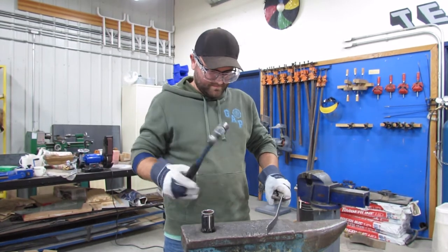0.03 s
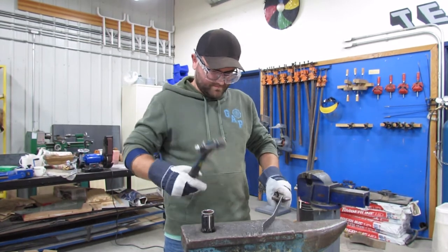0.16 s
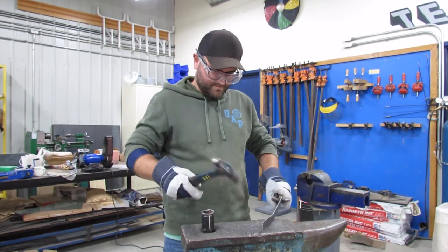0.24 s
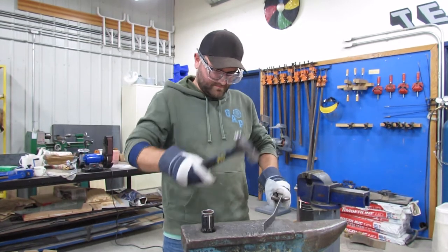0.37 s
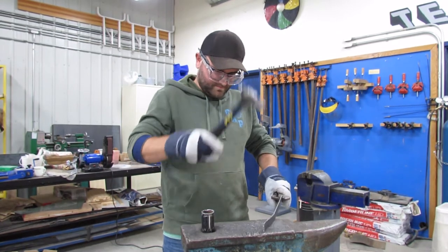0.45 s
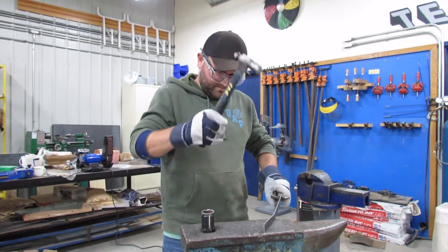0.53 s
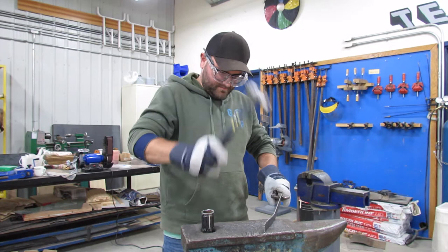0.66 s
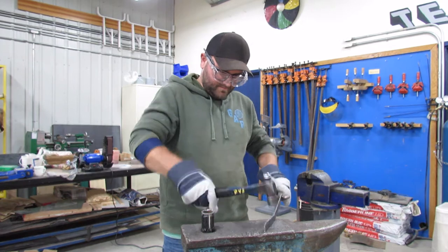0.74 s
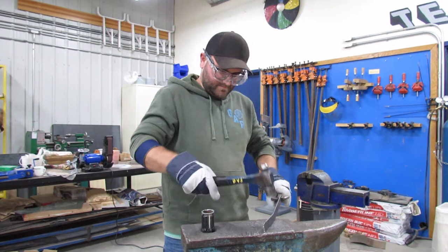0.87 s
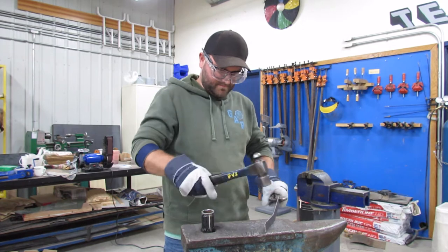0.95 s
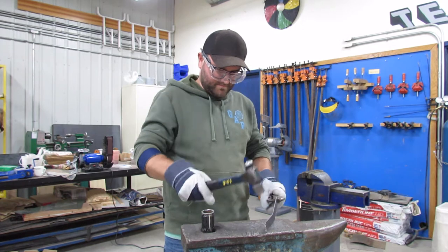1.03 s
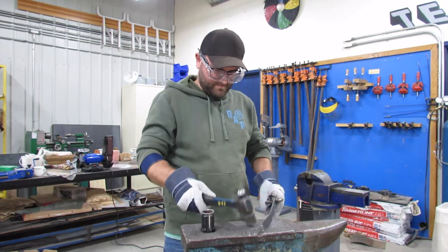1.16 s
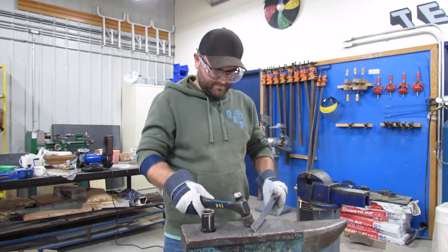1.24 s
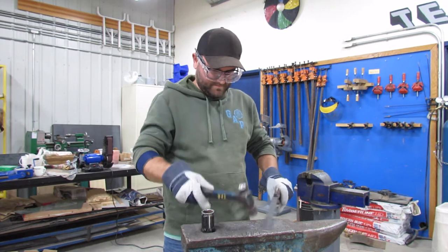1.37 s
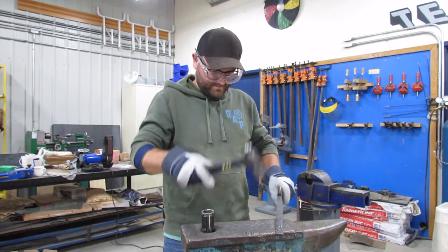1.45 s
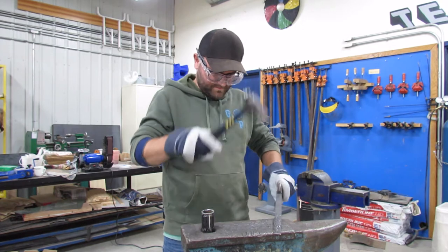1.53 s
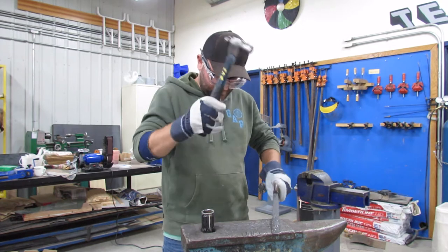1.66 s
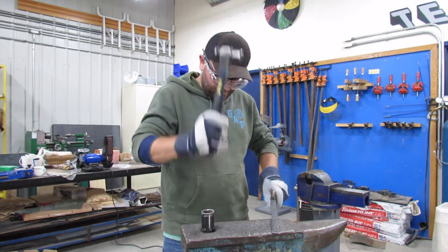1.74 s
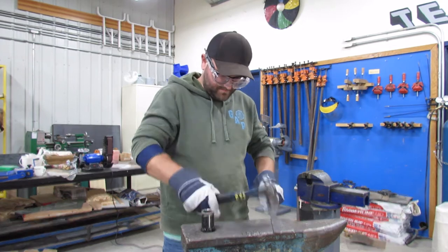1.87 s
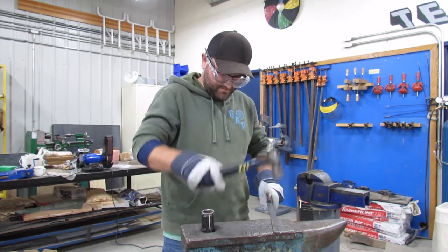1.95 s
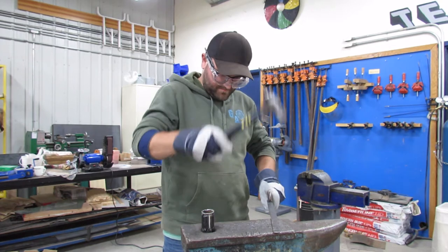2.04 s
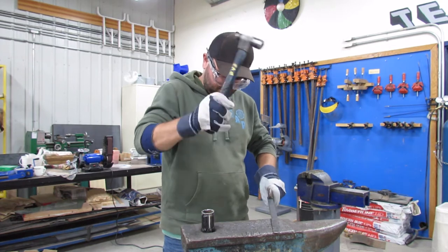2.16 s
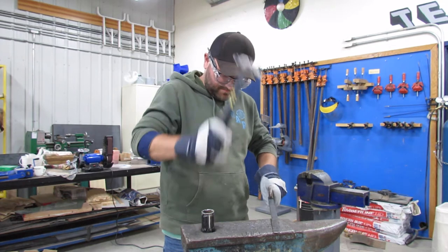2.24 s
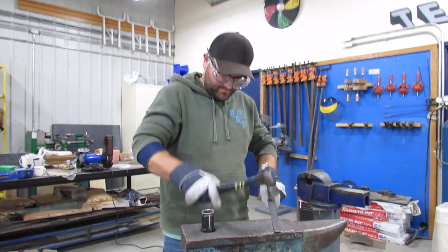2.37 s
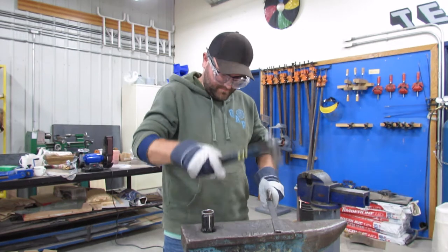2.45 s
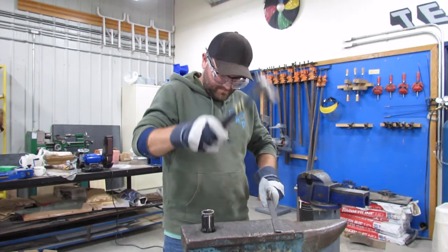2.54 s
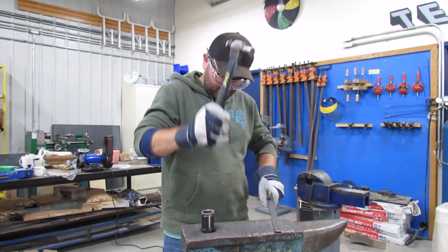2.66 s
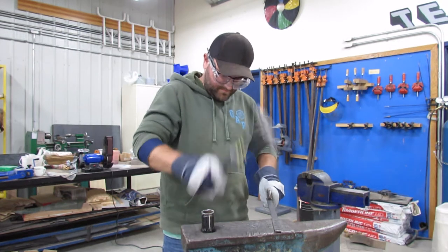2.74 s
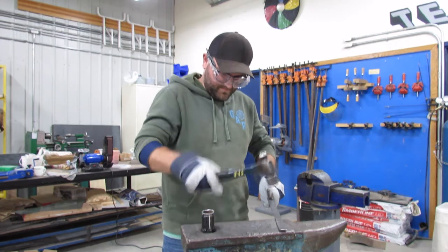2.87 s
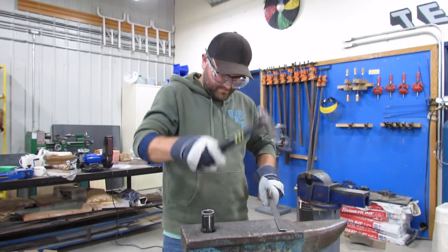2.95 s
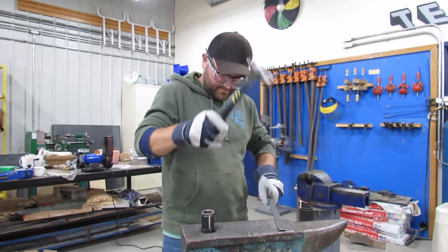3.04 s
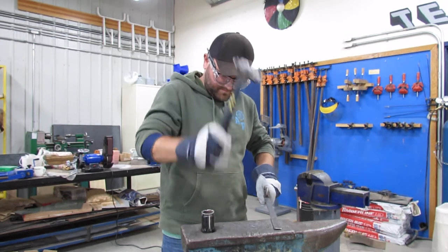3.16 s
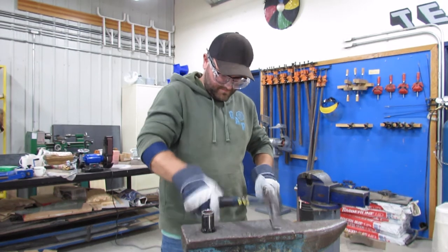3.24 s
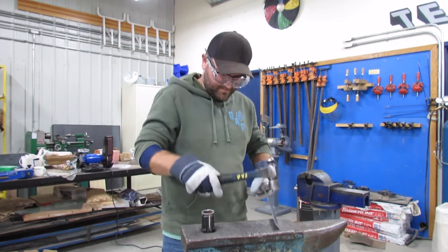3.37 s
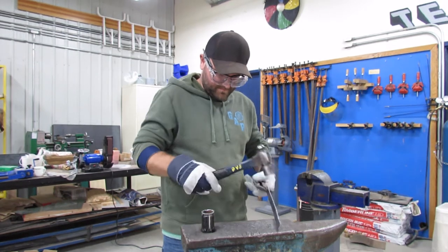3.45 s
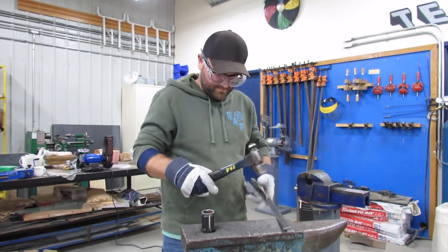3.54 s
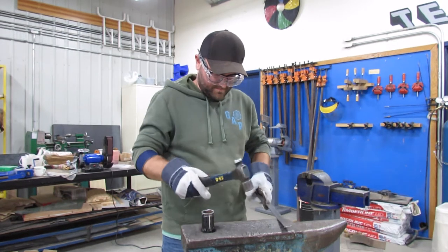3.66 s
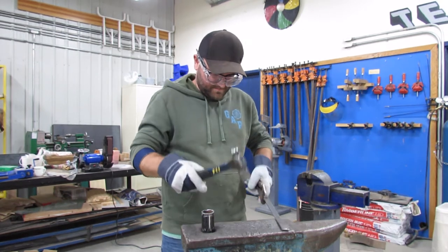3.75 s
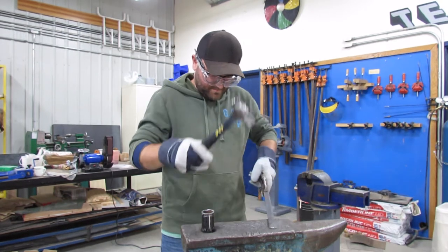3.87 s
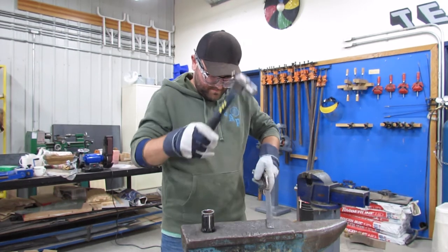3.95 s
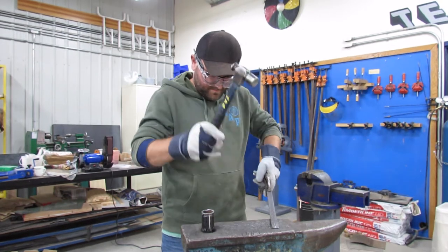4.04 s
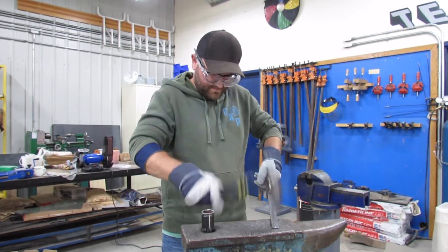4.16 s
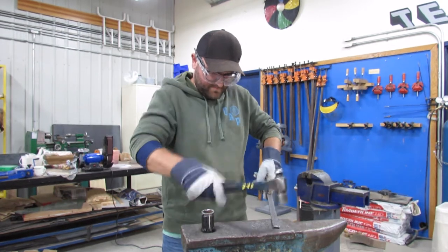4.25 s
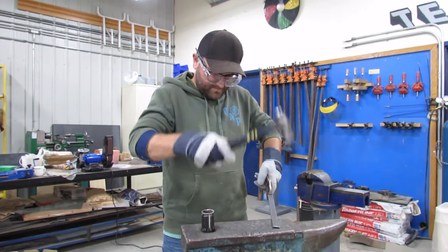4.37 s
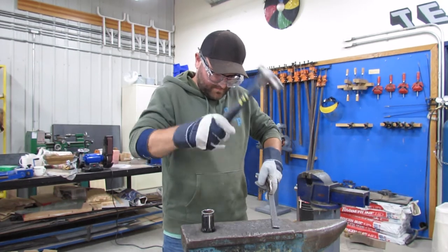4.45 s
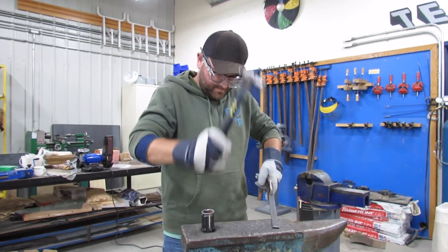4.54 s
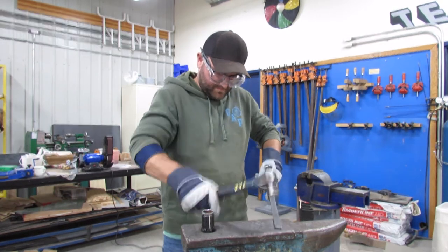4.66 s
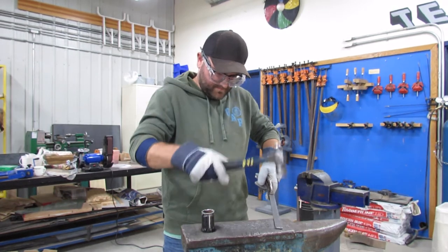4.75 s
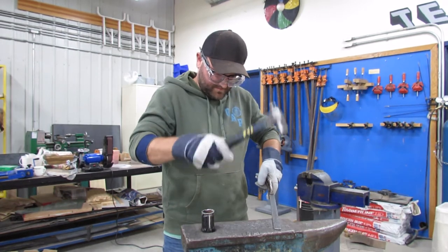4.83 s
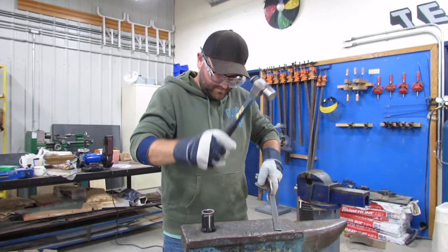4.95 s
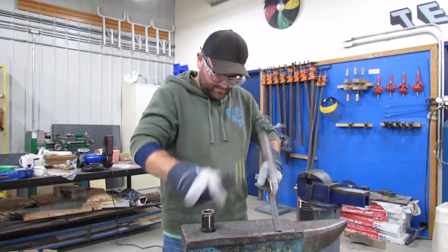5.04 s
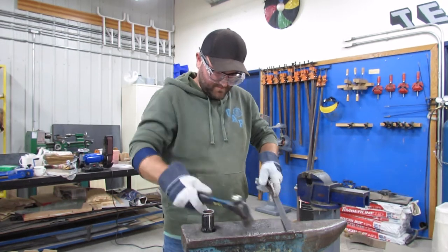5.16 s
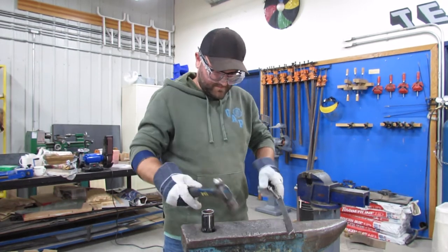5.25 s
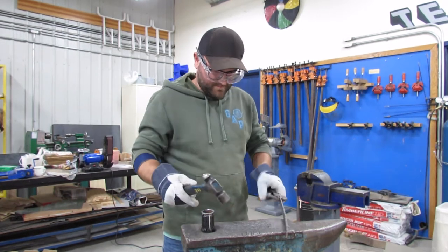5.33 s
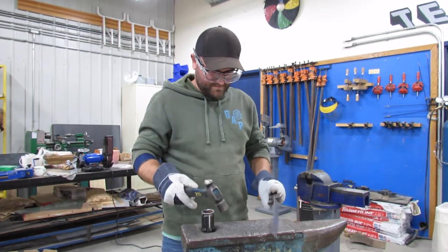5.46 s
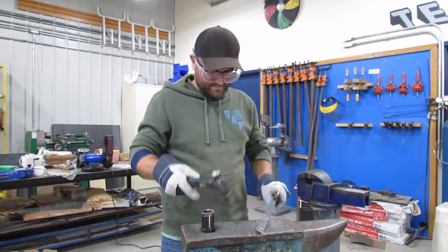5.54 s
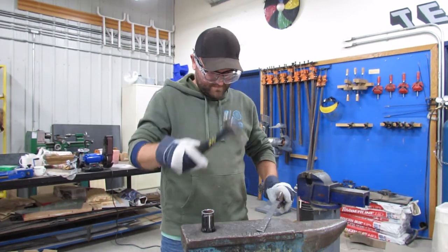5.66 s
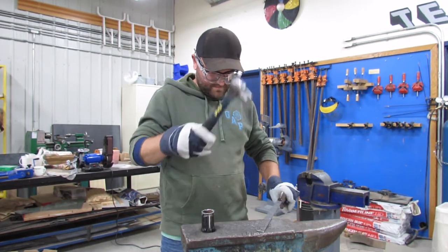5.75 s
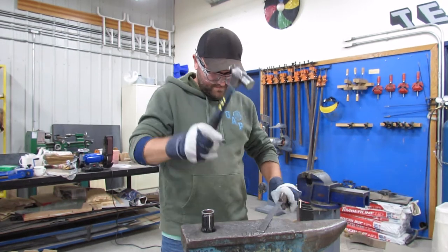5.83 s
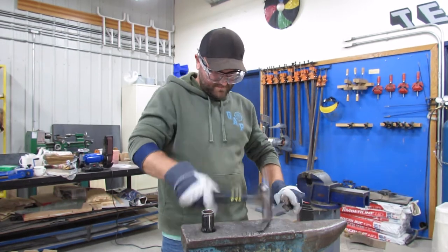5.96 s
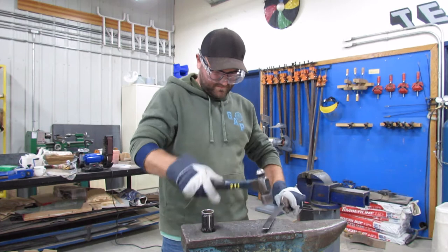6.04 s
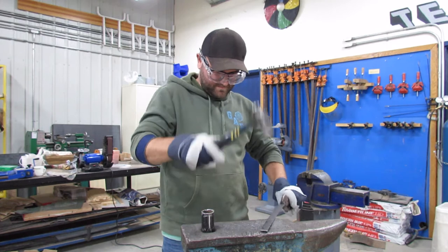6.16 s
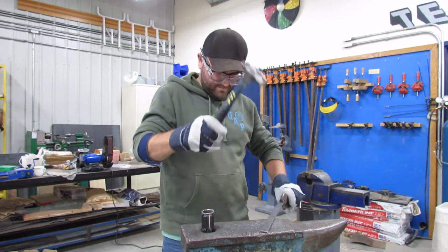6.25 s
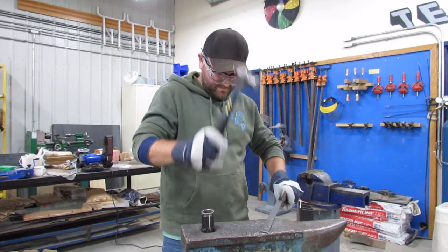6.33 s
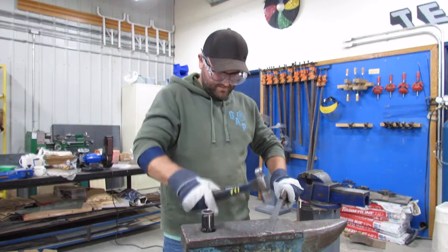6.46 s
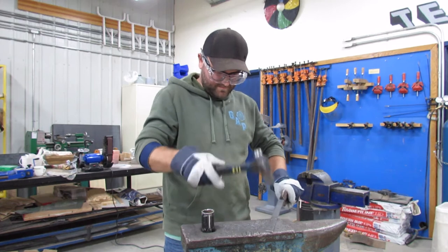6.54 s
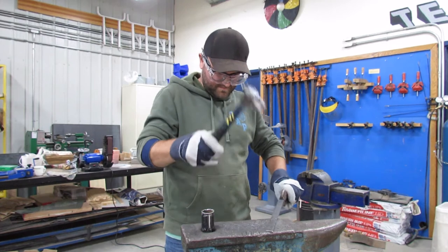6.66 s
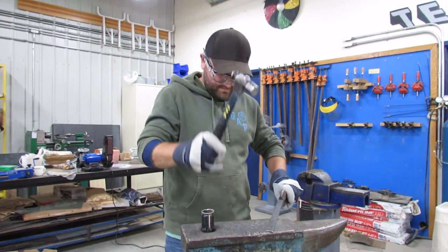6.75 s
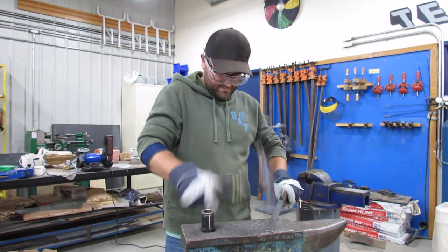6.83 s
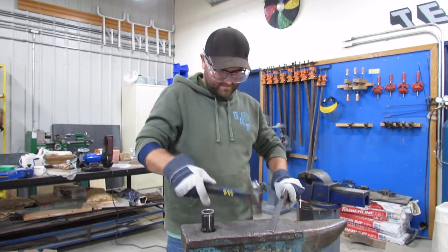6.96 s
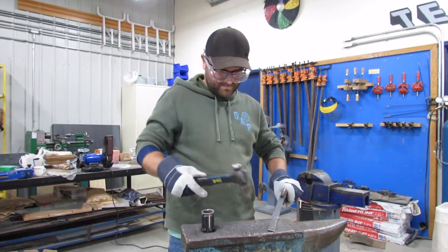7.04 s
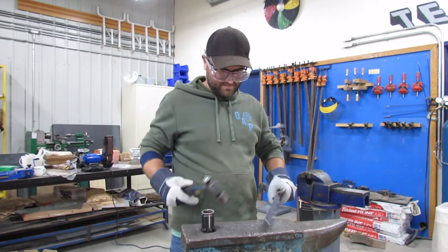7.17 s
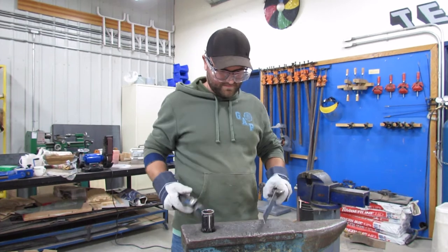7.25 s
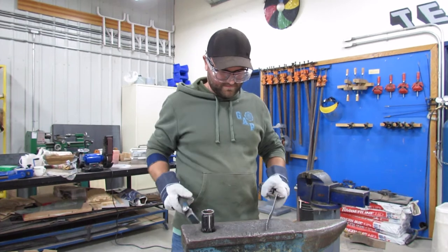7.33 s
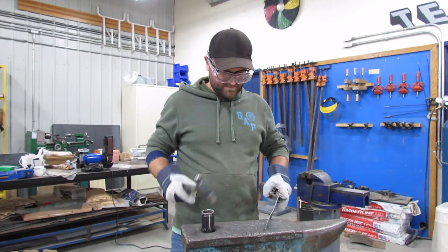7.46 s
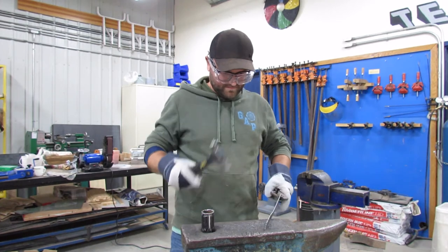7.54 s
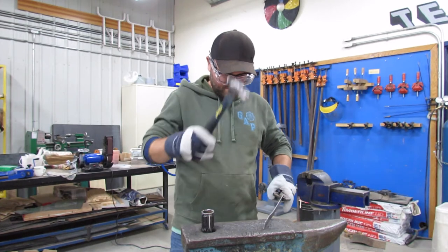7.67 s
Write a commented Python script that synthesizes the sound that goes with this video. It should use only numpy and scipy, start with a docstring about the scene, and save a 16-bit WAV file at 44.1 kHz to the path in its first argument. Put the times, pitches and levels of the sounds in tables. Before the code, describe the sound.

A hammer strikes a flat steel bar on an anvil: one blow, then a run of four, then two runs of three. Each hit is a sharp crack with a brief, bright metallic ring and a low thud from the stand. In the pauses the bar lightly taps and scrapes the anvil. The workshop reverberates and distant machines hum faintly, heard from a few metres away.

```python
"""A ball peen hammer strikes a hand-held steel flat bar on an anvil in a metal-walled workshop.
Each blow cracks and briefly rings the steel modes; the stand thuds and the hall reverberates.
Between blows the bar taps and drags on the anvil face. Distant machines hum and rush faintly.
The blows clip softly and set off a low lurch in the microphones, a few metres away."""
import sys
import numpy as np
from scipy import signal
from scipy.fft import rfft, irfft, next_fast_len
from scipy.io import wavfile
from scipy.ndimage import uniform_filter1d, map_coordinates

SR = 44100
rng = np.random.default_rng(int(sys.argv[2]) if len(sys.argv) > 2 else 0)


def transcribe(u):
    """Save the signal u as a 16-bit wav file named by the first command-line argument.

    u: samples, shape (n,) or (channels, n), limited to [-1, 1]; the rate is SR.
    q: integer samples, one column per channel.
    """
    v = np.clip(np.atleast_2d(u).T, -1, 1)
    q = np.round(v * 32767).astype(np.int16)
    wavfile.write(sys.argv[1], SR, q)


N = 339570

# hammer blows: start_s, force_db, bar_db, anvil_db, tilt_db_per_octave, lurch_right_fullscale,
# then by spot struck: low_mode_db, ping_db, body_db, clang_db
BLOWS = [(0.799, -6.5, -4.5, -3, -4.5, -0.031, 7, -10, 4, 4),
         (1.931, -4.5, 0.5, 0.5, 3.5, -0.78, 3.5, -6, 0, 2),
         (2.3959, -5.5, 2, 3, 3, -0.79, -1.5, -2.5, 1, 1),
         (2.8503, -3, -2.5, 0.5, 0.5, 0.023, -1.5, -9, 1, 2.5),
         (3.3173, -3, 0.5, 0, -1, -0.36, 1.5, 0, -0.5, 3),
         (4.252, -5.5, 3, -5, 4.5, 0.28, -10.5, 4.5, 1.5, 5.5),
         (4.6944, -3.5, -1, 2.5, 3, 0.31, 1, 6, 1, -0.5),
         (5.141, -5.5, 4.5, 1.5, -1.5, 0.12, -2.5, -7, 0.5, 1),
         (6.0352, -4, 1, -0.5, 4.5, -0.025, 4.5, 1.5, -1, 0.5),
         (6.4923, -2.5, -3.5, -1, 3.5, -0.025, -0.5, -4, -0.5, -1.5),
         (6.9212, -3, 0.5, 0.5, -4.5, 0.22, 0, 0.5, -1, -3.5),
         (7.0067, -22, 5, 4.5, -5, -0.025, 0, 12, -1.5, -5)]
# steel-on-steel contact spectrum: freq_hz, level_db
CRACK = [(200, -25.5), (500, -17.5), (1100, -8.5), (1600, 2), (3500, -3), (5000, 0), (8000, 1), (10500, -6),
         (13000, -5.5), (16500, -28)]
# bending modes of the bar: freq_hz
BAR_HZ = [2755, 4440, 5502, 6630, 7933, 9500, 10890, 12700]


def hammer():
    """Each blow pushes air, cracks, rings the steel, slaps the bar down and thuds the stand."""
    settle_s, thud_s, slap_s = 0.0006, 0.003, 0.0032  # delays after first touch
    low_hz, ping_hz, clang_hz = 2755, 5502, [3480, 3563]  # modes most sensitive to the spot struck
    push_width_s, beam_hz = 0.00025, 6000
    u = np.arange(SR // 200) / SR / push_width_s - 3
    push = np.tile(-u * np.exp(-u * u / 2), (2, 1))  # air pulse of the stopped head
    click = filtered(np.arange(SR // 2) == 128, lambda hz: amp(along(CRACK, hz)))
    click /= np.linalg.norm(click)  # the crack as the walls average it
    pole = np.exp(-2 * np.pi * beam_hz / SR)  # higher modes beam narrowly, stir the hall less
    out = np.zeros((2, N))
    for s, db, bar_db, anvil_db, tilt_db, _, low_db, ping_db, body_db, clang_db in BLOWS:
        def colour_db(hz):
            spot_db = clang_db * np.isin(hz, clang_hz) + low_db * (hz == low_hz)
            return tilt_db * np.log2(hz / 4000) + spot_db + ping_db * (hz == ping_hz)
        steel = ring(bar_db, anvil_db, colour_db, hold=0.075, grip_t60_s=1.0, rise_s=0.00026)
        rasp = amp(-0.5) * crack(t60_s=0.047, rise_s=0.0003)
        impact = amp(9) * crack(t60_s=0.007, rise_s=0.0001)
        add(out, s + settle_s, amp(db - 6.5) * (steel + rasp + impact))
        send = amp(-1) * signal.lfilter([1 - pole], [1, -pole], steel) + rasp + amp(23) * click
        add(out, s + settle_s, hall(amp(db - 5.5) * send, early_db=-9, late_db=-13, early_t60_s=0.19))
        add(out, s + settle_s, amp(db + body_db - 7) * push)
        add(out, s + slap_s, amp(db + 2) * crack(t60_s=0.0069, rise_s=0.0013))
        add(out, s + slap_s, amp(db - 13) * push * [[1], [-1]])  # from the side: antiphase
        add(out, s + thud_s, amp(db + body_db - 34.5) * thud())
    return out


def ring(bar_db, anvil_db, colour_db, hold, grip_t60_s, rise_s):
    """Steel modes: a fast first loss against the anvil, then a held part damped by the grip."""
    # modes of bar, hammer and anvil: freq_hz
    steel_hz = [1570, 1750, 1940, 2630, 2755, 3480, 3563, 3940, 4440, 4940, 5502, 5865, 6100, 6175, 6630,
                6850, 7933, 8300, 9050, 9380, 9500, 10890, 12700]
    # per mode: level_db, t60_s
    steel_modes = [(-6, 0.22), (-4, 0.14), (-21.5, 0.21), (-9, 0.029), (-1.5, 0.34), (-0.5, .3), (-6, 3.5),
                   (-2.5, 0.063), (-12, 1.8), (-23.5, .046), (-7, 1.4), (-8.5, 0.18), (-5.5, 0.016),
                   (3, 0.086), (-5, .09), (-11, .06), (0.5, 0.061), (-7, 0.015), (-7.5, .06), (3, 0.1),
                   (-4.5, .08), (-2.5, 0.0067), (-4, 0.015)]
    t = np.arange(SR // 2) / SR
    hz = np.c_[steel_hz]
    db, t60_s = np.transpose(steel_modes)[:, :, None]
    db = db + np.where(np.isin(hz, BAR_HZ), bar_db, anvil_db) + colour_db(hz)
    db += 1.8 * rng.standard_normal(hz.shape)
    side_db = 0.53 * rng.standard_normal(hz.shape)
    side_rad = hz / 5000 * rng.standard_normal(hz.shape)
    # the bar chatters on the anvil: phase drift blurs the high modes most
    walk = rng.standard_normal((len(hz), len(t) // 128 + 1)).cumsum(axis=1)
    walk = uniform_filter1d(walk.repeat(128, axis=1)[:, :len(t)], size=128, axis=1)
    chatter_rad = walk * (0.06 + (hz / 20000) ** 2)
    phase = 2 * np.pi * hz * t + np.pi * (hz // 1000) + chatter_rad  # sign flips each kHz
    fade = hold * amp(-60 * t / t60_s - 60 * t / grip_t60_s) + amp(-60 * t / 0.024)
    sides = [amp(db + k * side_db) * fade * np.sin(phase + k * side_rad) for k in (0.5, -0.5)]
    return np.sum(sides, axis=1) * (1 - np.exp(-t / rise_s))


def crack(t60_s, rise_s):
    """Noise burst of two steel faces meeting."""
    t = np.arange(SR // 2) / SR
    noise = rng.standard_normal(len(t)) + 0.49 * rng.standard_normal((2, len(t)))
    noise = unit(filtered(noise, lambda hz: amp(along(CRACK, hz))))
    return noise * amp(-60 * t / t60_s) * (1 - np.exp(-t / rise_s))


def thud():
    """Modes of the anvil stand over a rough boom from floor and walls."""
    # stand and floor modes: freq_hz, level_db, t60_s
    stand_modes = [(94, 0, 0.18), (146, 4, 0.038), (172, -8.5, 0.59), (203, -8, 0.48), (246.1, -4.5, 0.21),
                   (310, 5, 0.1), (390, -6, 0.067), (779.6, -3.5, 0.13), (1100, 8, 0.031)]
    # boom spectrum: freq_hz, level_db
    boom_spectrum = [(40, -35), (80, 0.5), (130, 0.5), (260, -5.5), (450, -28), (1000, -15), (1500, -50)]
    t = np.arange(SR // 2) / SR
    modes = sum((-1) ** k * amp(db - 60 * t / t60_s) * np.sin(2 * np.pi * hz * t)
                for k, (hz, db, t60_s) in enumerate(stand_modes))
    noise = rng.standard_normal(len(t)) + 0.25 * rng.standard_normal((2, len(t)))
    boom = unit(filtered(noise, lambda hz: amp(along(boom_spectrum, hz))))
    envelope = amp(-60 * t / 0.33) * (1 - np.exp(-t / 0.00062))
    return (modes + amp(7.5) * boom * envelope) * amp([[1.8], [-1.8]])


def bar_taps():
    """The bar taps the anvil face; returns the steel sound and the stand's knocks."""
    # light contacts: start_s, level_db, pitch_hz, octave_loss_db, anvil_db, noise_db, rise_s
    taps = [(1.248, -37, 1440, 9.5, 7.5, 11.5, 0.000081), (1.277, -48, 5400, 6, -25, -6, 0.0013),
            (1.337, -36, 6320, 3.5, -16.5, -6.5, 0.0015), (1.3815, -28, 7000, 7, -16, 3.5, 0.0052),
            (1.4538, -35, 8160, 10, -14, -4.5, 0.0011), (1.4738, -24, 5470, 59, -32, -29.5, 0.0028),
            (3.6139, -37.5, 5340, 29, -19.5, -4.5, .001), (3.651, -35, 7940, 7.5, -16, -7.5, 0.00088),
            (3.853, -46.5, 5850, 10, -13, 7, 0.00047), (5.5773, -42, 6850, 12, -13.5, -13.5, 0.0013),
            (5.5981, -40.5, 5190, 12.5, -21, -2.5, 0.00096), (7.3664, -40, 4200, 7.5, -2.5, 9.5, 0.00089)]
    out, knocks = np.zeros((2, 2, N))
    for s, db, pitch_hz, loss_db, anvil_db, noise_db, rise_s in taps:
        rise_s += 1e-5
        colour_db = lambda hz: band_db(hz, pitch_hz, loss_db)
        steel = ring(0, anvil_db, colour_db, hold=0.5, grip_t60_s=0.16, rise_s=rise_s)
        contact = filtered(crack(0.051, rise_s), lambda hz: amp(colour_db(hz) / 2))
        add(out, s, amp(db) * (steel + amp(noise_db) * contact))
        add(knocks, s, amp(db + anvil_db - 22) * thud())
    return out, knocks


def bar_drags():
    """Grit under the sliding edge excites modes of bar and anvil."""
    # slides: start_s, peak_s, end_s, level_db, end_drop_db, pitch_hz
    drags = [(1.273, 1.272, 1.38, -49.5, 6, 4800), (1.424, 1.479, 1.5, -38.5, 11.5, 6400),
             (3.631, 3.668, 3.77, -41.5, 22, 8500), (3.87, 3.898, 4.0, -51, 0.5, 5300),
             (4.014, 4.057, 4.09, -62.5, 6.5, 5600), (5.53, 5.601, 5.65, -46.5, 13, 4970)]
    # sliding contact spectrum: freq_hz, level_db
    grit_spectrum = [(1000, -18), (2750, -3.5), (3560, -2.5), (4440, -8.5), (5500, -4), (7930, -6),
                     (9500, -6.5), (12700, -19.5), (16000, -33)]
    # rubbed anvil modes: freq_hz
    rub_hz = [3563, 4940]
    width_hz, fade_s = 80, 0.02

    def resonance(hz):
        damping = 1j * hz * width_hz
        return 0.2 + sum(amp(1.8 * rng.standard_normal()) * damping / (mode_hz ** 2 - hz ** 2 + damping)
                         for mode_hz in BAR_HZ + rub_hz)

    out = np.zeros((2, N))
    for start_s, peak_s, end_s, db, drop_db, pitch_hz in drags:
        t = start_s - fade_s + np.arange(SR // 4) / SR
        grit = rng.standard_normal((2, len(t))) * amp(3.5 * wobble(400, size=len(t)))
        colour_db = lambda hz: along(grit_spectrum, hz) + band_db(hz, pitch_hz, octave_loss_db=2)
        scrape = unit(filtered(grit + 0.29 * grit[0], lambda hz: amp(colour_db(hz)) * resonance(hz)))
        knots_s = [start_s - fade_s, start_s, peak_s, end_s, end_s + fade_s]
        shape_db = np.interp(t, knots_s, [-40, -drop_db, 0, -drop_db, -40], -200, -200)
        add(out, t[0], amp(db + shape_db) * scrape)
    return out


def hall(x, early_db, late_db, early_t60_s):
    """Reflections from near walls and the whole hall, a new noise tail per call."""
    # hall decay: freq_hz, t60_s
    decay = [(100, 0.67), (400, 1), (1200, 0.77), (3000, 0.91), (7000, 0.73), (12000, 0.57), (16000, 0.24)]
    hz, t, spectra = signal.stft(rng.standard_normal((2, SR)), SR, nperseg=256)
    late = amp(-60 * t / along(decay, hz)[:, None])
    early = amp(-60 * t / early_t60_s)
    gain = amp(late_db) * late / np.linalg.norm(late.mean(0))
    gain += amp(early_db) * early / np.linalg.norm(early)
    tail = signal.istft(spectra * gain, SR, nperseg=256)[1] / np.sqrt(128)
    tail[1] += 0.21 * tail[0]  # closely spaced microphones
    delayed = np.pad(x, ((0, 0), (round(0.0035 * SR), 0)))
    return signal.fftconvolve(delayed, tail, axes=1)


def machine_rush():
    """Patchy noise of distant machines, louder on the left."""
    # rush level: time_s, level_db
    levels = [(0.0, -56), (1.97, -54), (2.08, -58), (4.1, -57.5), (5.88, -58.5), (6.5, -58), (7.7, -58)]
    # rush spectrum: freq_hz, level_db
    spectrum = [(13, -27), (22, -2), (119, -1), (176, 0), (314, -6.5), (426, -8), (1090, -14),
                (1750, -17.5), (2070, -21), (2800, -23.5), (6300, -25), (13600, -41), (16500, -56)]
    # left-right likeness: freq_hz, correlation
    alike = [(60, 0.76), (950, 0.68), (3770, 0.12), (15000, 0.11)]
    # balance: freq_hz, left_over_right_db
    lean = [(60, 3.1), (380, 3.0), (2380, 2.0), (15000, 1.0)]
    spectra = signal.stft(rng.standard_normal((2, N)), nperseg=512)[2]
    patches = uniform_filter1d(rng.standard_normal(spectra.shape[1:]), size=4, axis=0)
    patches = uniform_filter1d(patches, size=16, axis=1)
    noise = signal.istft(spectra * amp(0.5 * unit(patches)), nperseg=512)[1][:, :N]

    def mid_side_gain(hz):
        width_rad = np.arccos(along(alike, hz)) / 2
        return amp(along(spectrum, hz)) * [np.cos(width_rad), np.sin(width_rad)]

    mid, side = filtered(noise, mid_side_gain)
    rush = filtered(np.array([mid + side, mid - side]), lambda hz: amp(along(lean, hz) * [[.5], [-.5]]))
    return amp(np.interp(np.arange(N) / SR, *np.transpose(levels))) * unit(rush)


def machine_hum():
    """Wavering machine tones; one swells now and then into a whine."""
    # tones: freq_hz, level_db
    tones = [(118.4, -68.5), (350, -72.5), (425, -73), (1373, -77), (2116, -83)]
    # whine swells: peak_s, boost_db
    swells = [(.2, 11), (.58, 12), (1.63, 11.5), (5.97, 3.5), (7.6, 10)]
    whine_hz, swell_s, waver_db = 1373, 0.05, 3
    t = np.arange(N) / SR
    swell_db = sum(db * np.exp(-((t - s) / swell_s) ** 2) for s, db in swells)
    hum = np.zeros(N)
    for hz, db in tones:
        level_db = db + 5 + swell_db * (hz == whine_hz) + waver_db * (wobble(21) + wobble(3.2) / 2)
        hum += amp(level_db) * np.sin(2 * np.pi * hz * t + 2.9 * wobble(12))
    return hum * amp([[1.5], [-1.5]])


def amp(db):
    """Decibels to gain."""
    return 10 ** (np.asarray(db) / 20)


def unit(x):
    """Scale to rms 1."""
    return x / np.sqrt(np.mean(x ** 2) + 1e-20)


def along(points, hz):
    """Interpolate (freq_hz, value) points on a log axis."""
    knots_hz, values = np.transpose(points)
    return np.interp(np.log(hz + 1), np.log(knots_hz + 1), values)


def band_db(hz, centre_hz, octave_loss_db):
    """Bell curve on a log axis."""
    return -octave_loss_db * np.log2((hz + 1) / centre_hz) ** 2


def wobble(rate_hz, size=N):
    """Smooth random curve."""
    knots = rng.standard_normal(int(size * rate_hz / SR) + 4)
    at = np.arange(0, size + 16, 16)
    return np.interp(np.arange(size), at, map_coordinates(knots, [at * rate_hz / SR]))


def filtered(x, response):
    """Apply a complex frequency response."""
    size = next_fast_len(x.shape[-1] + 8192, True)
    return irfft(rfft(x, size) * response(np.fft.rfftfreq(size, 1 / SR)), size)[..., :x.shape[-1]]


def add(track, start_s, sound):
    """Mix in a stereo sound."""
    part = track[:, round(start_s * SR):][:, :sound.shape[1]]
    part += sound[:, :part.shape[1]]


def scene():
    """Blows, bar handling and machines, in stereo."""
    blows = hammer()
    taps, knocks = bar_taps()
    handling = taps + bar_drags()
    reverb = hall(handling, early_db=-8, late_db=-14, early_t60_s=0.12)[:, :N]
    return blows + handling + reverb + knocks + machine_rush() + machine_hum()


def record(dry):
    """Microphones: an antiphase low lurch at each blow, soft clipping, treble loss, band limit."""
    # microphone response: freq_hz, gain_db
    mic_response = [(13000, -1.5), (14800, 3), (15800, -9), (16770, -20.5)]
    lag_s, swing_hz, clip_level, bottom_hz, top_hz = 0.0011, 10, 0.8, 15, 16770
    lurch = np.zeros((2, N))
    for s, right in np.array(BLOWS)[:, [0, 5]]:
        length_s = 0.00025 + 0.004 * abs(right)
        add(lurch, s + lag_s, right * np.outer([-0.45, 1], np.hanning(round(length_s * SR))))
    highpass = lambda hz, corner_hz: 1j * hz / (1j * hz + corner_hz)
    x = dry + filtered(lurch, lambda hz: highpass(hz, swing_hz) ** 2)
    x = x / (1 + np.abs(x / clip_level) ** 4) ** 0.25
    return filtered(x, lambda hz: amp(along(mic_response, hz)) * (hz < top_hz) * highpass(hz, bottom_hz))


dry = scene()
out = record(dry)
transcribe(out)
```